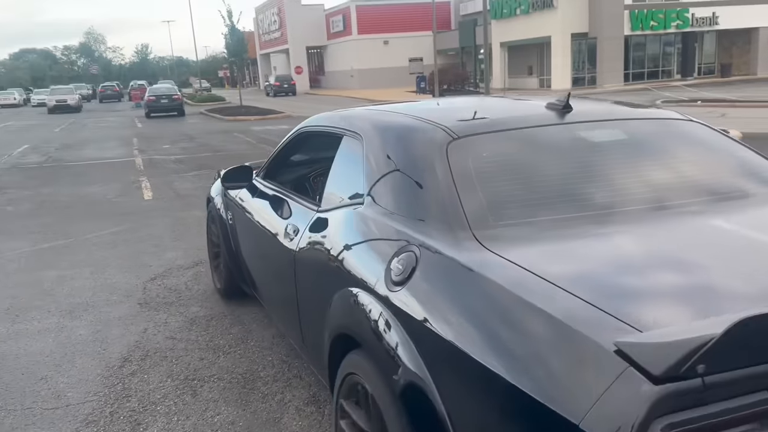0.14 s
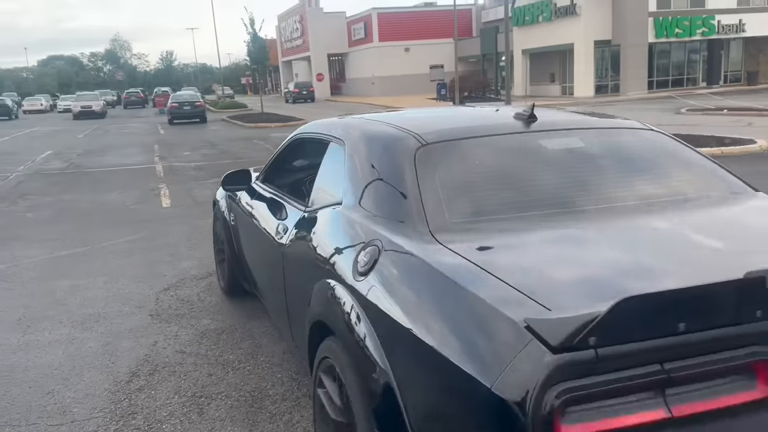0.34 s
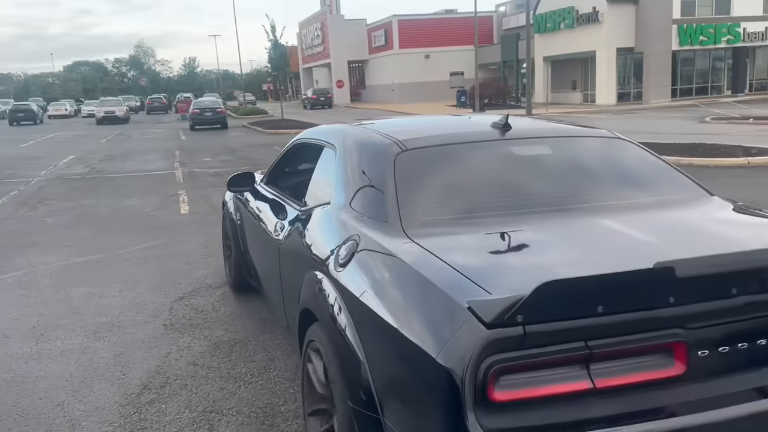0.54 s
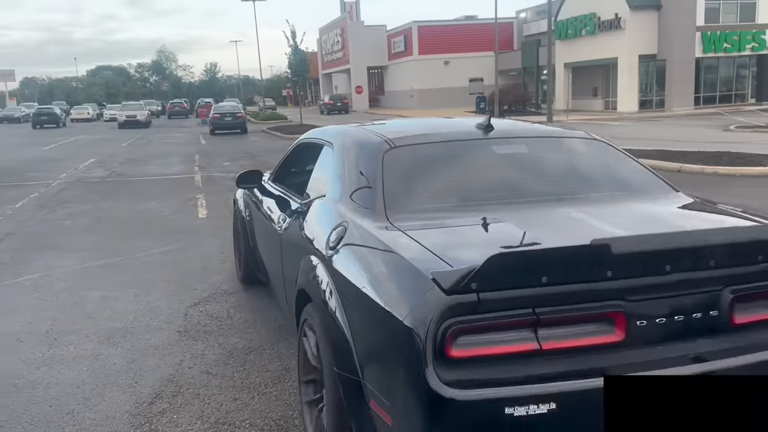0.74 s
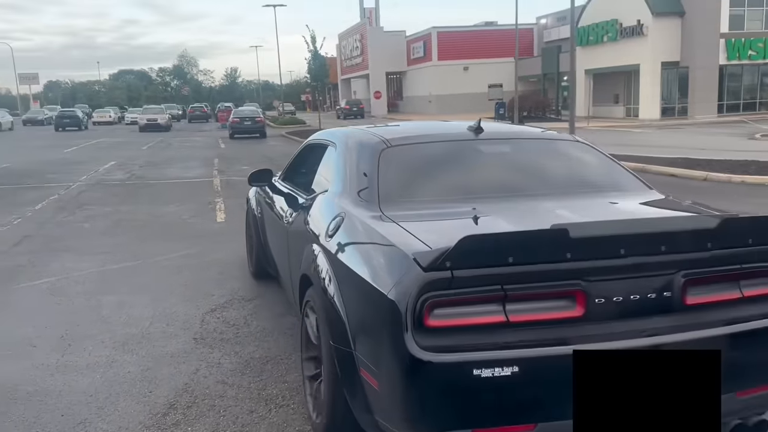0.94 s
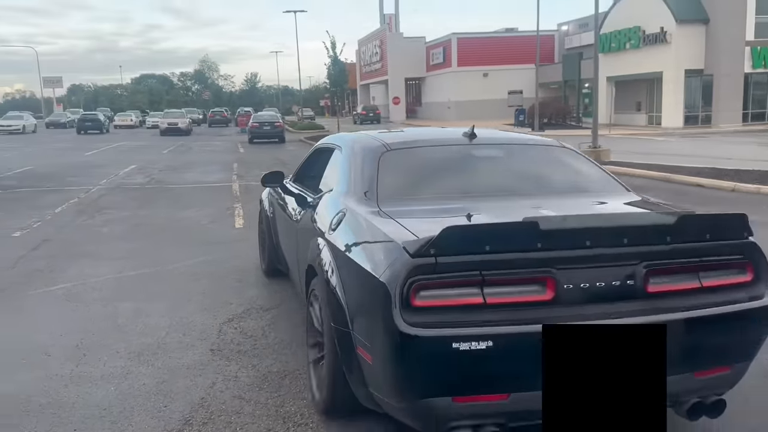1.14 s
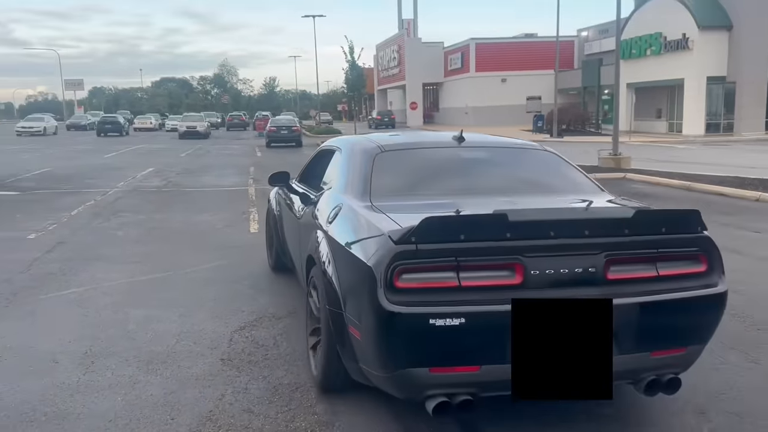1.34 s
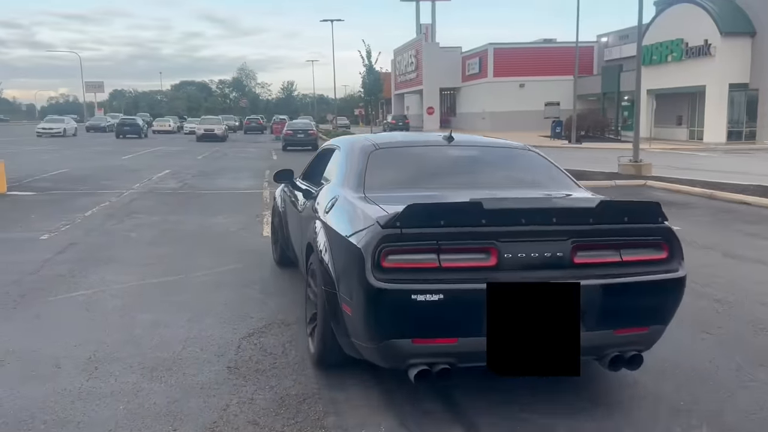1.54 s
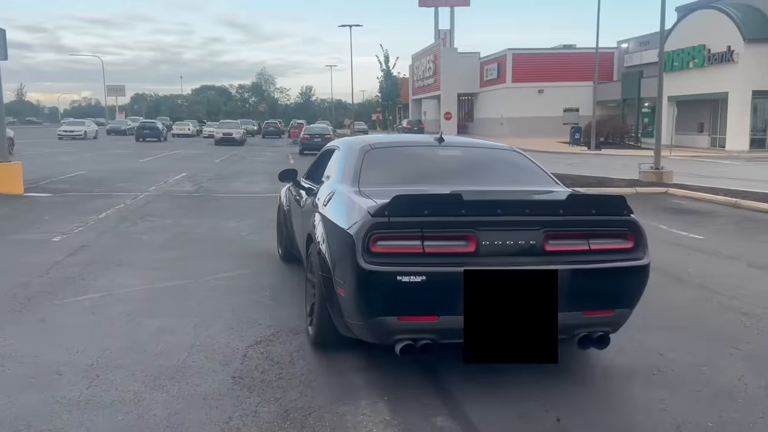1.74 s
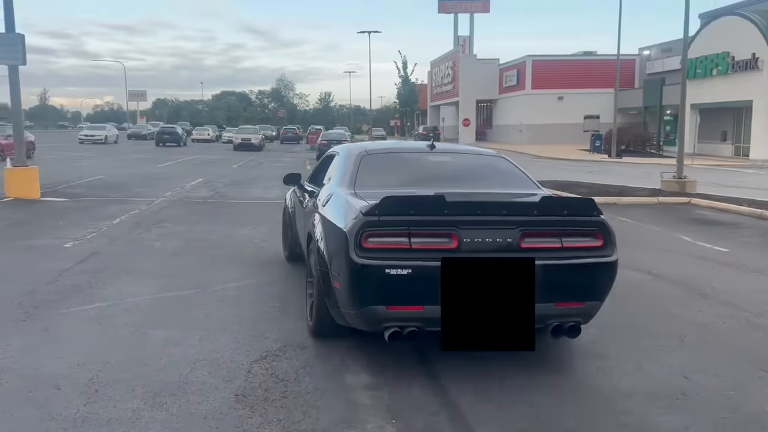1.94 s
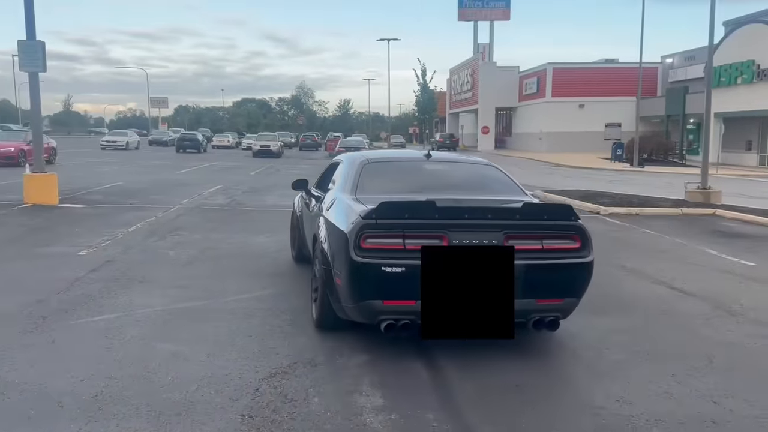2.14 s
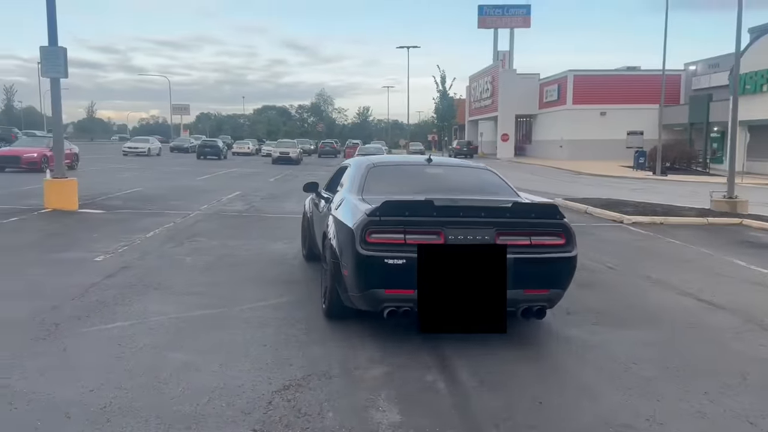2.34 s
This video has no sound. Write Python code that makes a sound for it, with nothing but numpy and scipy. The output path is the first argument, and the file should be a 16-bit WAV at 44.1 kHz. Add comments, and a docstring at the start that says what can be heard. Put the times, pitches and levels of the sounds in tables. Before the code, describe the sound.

A powerful V8 car pulls away from low revs in an open car park, its bassy, uneven exhaust burble rising in pitch, with raspy puffs, faint tyre hiss and gritty scuffs, heard close from behind.

```python
"""In an open car park an eight-cylinder engine pulls away from low revs, its firing rate climbing.
The exhaust is a firing note with its octave, uneven pulses ringing the pipes, and puffs of noise.
Coloured noise makes the rumble, hiss, gritty scuffs and two ticks on the asphalt.
A low hum fades early, a soft low swell comes near the end, and a thin echo follows the engine."""
import sys
import numpy as np
from scipy import signal
from scipy.fft import rfft, irfft, next_fast_len
from scipy.io import wavfile
from scipy.ndimage import uniform_filter1d, minimum_filter1d, map_coordinates

SR = 44100
rng = np.random.default_rng(int(sys.argv[2]) if len(sys.argv) > 2 else 0)


def to_wav(s):
    """Save 16-bit WAV."""
    ch = np.atleast_2d(s).T  # columns
    pcm = np.round(np.clip(ch, -1, 1) * 32767)  # PCM
    wavfile.write(sys.argv[1], SR, pcm.astype(np.int16))


N = 110250  # 2.5 s of samples
T = np.arange(N) / SR


def amp(db):
    """Turn decibels into gain."""
    return 10 ** (np.asarray(db) / 20)


def unit(x):
    """Scale a sound to an rms (average strength) of 1."""
    return x / np.sqrt(np.mean(x ** 2) + 1e-20)


def curves(rows):
    """Join the rows with straight lines: one curve for each column after the time."""
    seconds, *columns = np.transpose(rows)
    return [np.interp(T, seconds, column) for column in columns]


def wobble(rate):
    """Draw a smooth random curve through this many random points a second."""
    return map_coordinates(rng.standard_normal(400), [T * rate + 2], mode="wrap")


def filtered(x, response):
    """Multiply the spectrum of x by a response that depends on frequency."""
    size = next_fast_len(N + SR // 4)
    spectrum = rfft(x, size) * response(np.fft.rfftfreq(size, 1 / SR))
    return irfft(spectrum, size)[..., :N]


def coloured(x, points):
    """Shape x by (pitch_hz, level_db) points on a log pitch axis, then scale to rms 1."""
    pitch_hz, level_db = np.transpose(points)
    return unit(filtered(x, lambda hz: amp(np.interp(np.log(hz + 1), np.log(pitch_hz), level_db))))


def spread(mid, side_db):
    """Make stereo: the middle sound, plus separate noise with opposite signs left and right."""
    side = amp(side_db) * rng.standard_normal(N)
    return np.array([mid + side, mid - side])


def noise(points, side_db):
    """Make coloured stereo noise of rms 1."""
    return coloured(spread(rng.standard_normal(N), side_db), points)


# tone colour of the rumble: pitch_hz, level_db (relative)
RUMBLE_COLOUR = [(12, -10.5), (30, -13.5), (55, -5), (150, -3.5), (300, -11.5), (500, -19), (1200, -22),
                 (4000, -71)]


def rumble():
    """Steady noise, strongest in the bass."""
    return amp(-27) * noise(RUMBLE_COLOUR, side_db=-7)


# hiss of tyres and air: start_s, level_db (before its random waver)
HISS = [(0, -49.5), (.7, -49.5), (1.4, -51), (2, -52.5), (2.5, -53)]
# tone colour of the hiss: pitch_hz, level_db (relative)
HISS_COLOUR = [(200, -10.5), (2500, 9.5), (4000, 1.5), (5200, -0.5), (6500, -1.5), (8300, -5.5),
               (9800, -5.5), (11000, -31.5), (13500, -16), (16000, -25.5)]


def hiss():
    """Tyres and air: faint noise with a quick waver, a little stronger on the left."""
    level = amp(curves(HISS)[0] + 1.5 * wobble(60))
    return level * noise(HISS_COLOUR, side_db=-3) * amp([[1.5], [-1.5]])


# gritty scuffs: middle_s, half_length_s, level_db (before a random waver)
SCUFFS = [(0.146, .016, -45), (0.194, 0.025, -49.5), (0.312, 0.0076, -46.5), (0.434, 0.008, -53.5),
          (0.626, 0.035, -57), (0.945, .014, -50), (1.149, 0.0099, -53.5), (1.36, 0.0091, -57.5),
          (1.569, .04, -55), (1.784, 0.0058, -61)]
# tone colour of the scuffs: pitch_hz, level_db (relative)
SCUFF_COLOUR = [(1500, -17.5), (3500, -10.5), (5000, -4), (6700, 4.5), (8300, 1.5), (10500, -19),
                (14000, -26.5), (16000, -23)]


def scuffs():
    """Scuffs on the asphalt: bright noise under bell-shaped swells, roughened by a fast waver."""
    swells = sum(amp(db) * np.exp(-((T - s) / half) ** 2 / 2) for s, half, db in SCUFFS)
    return swells * amp(0.82 * wobble(150)) * noise(SCUFF_COLOUR, side_db=-1)


# ticks: start_s, level_db
TICKS = [(1.167, -36), (2.31, -44.5)]
# tone colour of the ticks: pitch_hz, level_db (relative)
TICK_COLOUR = [(2000, -3), (6000, -6), (8500, -1), (11000, -13.5), (16000, -9.5)]
TICK_DECAY_S = 0.0021


def ticks():
    """Ticks from the asphalt: noise that starts at once and dies away within milliseconds."""
    strikes = sum(amp(db) * (T >= s) * np.exp(-abs(T - s) / TICK_DECAY_S) for s, db in TICKS)
    return strikes * noise(TICK_COLOUR, side_db=0.5)


# low hum beside the firing note: start_s, pitch_hz, level_db (both before a random waver)
HUM = [(0, 69.7, -26), (.3, 66.9, -17), (.5, 71.2, -21.5), (.7, 74.5, -24), (1, 69, -57.5)]


def hum():
    """A low tone of wandering pitch that fades almost to nothing by one second."""
    pitch_hz, level_db = curves(HUM)
    level = np.sqrt(2) * amp(level_db + wobble(2.8))
    return level * np.sin(2 * np.pi * np.cumsum(pitch_hz + 1.4 * wobble(20)) / SR)


THUMP_S, THUMP_HZ, THUMP_WIDTH_S, THUMP_DB = 2.32, 56, 0.037, -16.5  # time is the middle


def thump():
    """A soft low swell: a short bass tone under a bell-shaped level."""
    swell = amp(THUMP_DB) * np.exp(-((T - THUMP_S) / THUMP_WIDTH_S) ** 2)
    return swell * np.sin(2 * np.pi * THUMP_HZ * (T - THUMP_S))


LOT_T60_S = 0.15  # time for the echo to fall by 60 dB
LOT_START_DB, LOT_END_DB = -17.5, -20.5


def car_park(x):
    """A thin echo from the shop fronts: a decaying noise tail with less bass, slowly getting fainter."""
    t = np.arange(SR // 2) / SR
    tail = rng.standard_normal((2, len(t))) * amp(-60 * t / LOT_T60_S) * (t > .01)
    wet = signal.fftconvolve(x, tail / np.linalg.norm(tail[0]), axes=1)[:, :N]
    wet = filtered(wet, lambda f: f / (f + 150))
    return wet * amp(np.linspace(LOT_START_DB, LOT_END_DB, N))


# the eight cylinders in firing order, the first with a weak pulse; the functions below share them:
# puff_level_db, pulse_level_db (relative), delay_firings, ring_pitch_ratio (before sway)
CYLINDERS = [(-4, -9, 0.035, .92), (-3, 4.8, -0.044, 1.08), (-1.5, 3.87, 0.018, 1.047),
             (-8, 3.2, 0.028, 1.04), (-2, 1.2, -0.031, 0.995), (-4.5, 0.6, -0.009, 0.987),
             (-3, 0.8, -0.048, 0.938), (0, 0.1, 0.06, 0.82)]
# firings with a stronger puff: time_s, extra_level_db
HARD_FIRINGS = [(.43, 2), (.535, 3), (.903, 1), (1.039, 3), (1.413, 4), (1.535, 5.5), (1.653, 8)]
PUFF_RISE, PUFF_FALL, PUFF_LEAD, PUFF_JITTER = 0.16, 0.22, 0.0803, .03  # in firings
PUFF_SCATTER_DB = 4.5


def puff_train(turn, between, repeat, side_db):
    """A burst of turbulent gas at each firing; a share of its noise repeats every engine cycle."""
    n, count = len(CYLINDERS), 200
    chance = rng.standard_normal((count, 2))
    firing = (turn + PUFF_LEAD).astype(int)
    size_db = np.array(CYLINDERS)[np.arange(count) % n, 0] + PUFF_SCATTER_DB * chance[:, 0]
    for s, extra_db in HARD_FIRINGS:
        size_db[firing[int(s * SR)]] += extra_db
    late = abs(PUFF_JITTER * chance[firing, 1])
    age = np.maximum((turn + PUFF_LEAD) % 1 - late, 0)
    shape = (1 - np.exp(-(age / PUFF_RISE) ** 2)) * np.exp(-age / PUFF_FALL)
    # each cylinder replays its own noise from the moment it fires
    since = np.arange(N) - np.searchsorted(firing, firing)
    own = rng.standard_normal((n, SR // 10))[firing % n, since]
    share = np.clip(repeat, 0, 1)
    gas = np.sqrt(share) * own + np.sqrt(1 - share) * rng.standard_normal(N)
    # "between" is the steady flow under the puffs
    return (between + amp(size_db[firing]) * shape / shape.max()) * spread(gas, side_db)


def broad(gas, level, colour):
    """Puffs of gas heard in one broad register."""
    return amp(curves(level)[0]) * coloured(gas, colour)


PUFF_CEILING = 3.0  # the ring saturates around this multiple of its rms


def rung(gas, turn, track, width_hz, sway):
    """Puffs ring a resonance whose pitch shifts from cylinder to cylinder through each cycle."""
    pitch_hz, level_db = curves(track)
    ratio = np.array(CYLINDERS)[(turn + PUFF_LEAD).astype(int) % len(CYLINDERS), 3]
    carrier = np.exp(2j * np.pi * np.cumsum(pitch_hz * ratio ** sway) / SR)
    # shift the resonance down to zero pitch, keep a narrow band, then shift it back
    low_pass = signal.butter(2, width_hz / 2, fs=SR, output="sos")
    band = signal.sosfilt(low_pass, gas / carrier)
    band = band / np.sqrt(1 + (unit(abs(band)) / PUFF_CEILING) ** 2)
    return amp(level_db) * unit((band * carrier).real)


# gas puffs in three broad registers, low to high, each: start_s, level_db
CHUFF = [(0, -34.5), (0.501, -32), (1.001, -35.5), (1.501, -43), (1.901, -34.5), (2.201, -31.5), (2.5, -32)]
RASP = [(0, -40), (.5, -39), (1, -32.5), (1.501, -36.5), (1.801, -35.5), (2.101, -42.5), (2.5, -48.5)]
CRACKLE = [(0, -53), (.5, -48.5), (1.099, -49.5), (1.5, -44.5), (1.899, -47), (2.2, -40), (2.5, -43.5)]
# their tone colours, each: pitch_hz, level_db (relative)
CHUFF_COLOUR = [(250, -19), (410, -7), (550, -0.5), (720, -2), (850, -7.5), (1000, -16), (2000, -66.5)]
RASP_COLOUR = [(700, -50), (1000, 3), (1150, -2.5), (1420, 7.5), (1650, -11), (2300, -60)]
CRACKLE_COLOUR = [(1200, -35.5), (1680, 1), (1900, 4), (2200, 1.5), (2550, -1.5), (2900, -10.5),
                  (3400, -14), (4200, -25), (7000, -55.5)]
# two resonances rung by the puffs, higher at the end as the gas gets hotter and faster, each:
# start_s, pitch_hz (before each cylinder's ratio), level_db
BARK = [(0, 957, -27), (0.449, 931, -26), (0.798, 946, -28), (1.2, 986, -32.5), (1.6, 1152, -33),
        (1.849, 1177, -35), (2.1, 1064, -43.5), (2.5, 1080, -60)]
SNARL = [(0, 1880, -47.5), (0.501, 2003, -44), (0.952, 2286, -43), (1.298, 2580, -41), (1.598, 2680, -46),
         (1.902, 2780, -44), (2.098, 3130, -61), (2.5, 3236, -69)]


def exhaust_gas(turn):
    """Gas puffs fill three broad registers and ring a bark and, above it, a snarl."""
    chuff_gas = puff_train(turn, between=0.32, repeat=0.54, side_db=-8.5)
    chuff = broad(chuff_gas, CHUFF, CHUFF_COLOUR)
    rasp_gas = puff_train(turn, between=0.21, repeat=0.75, side_db=-3)
    rasp = broad(rasp_gas, RASP, RASP_COLOUR)
    crackle_gas = puff_train(turn, between=.2, repeat=.3, side_db=-9)
    crackle = broad(crackle_gas, CRACKLE, CRACKLE_COLOUR)
    bark_gas = puff_train(turn, between=0.076, repeat=0.26, side_db=-11.5)
    bark = rung(bark_gas, turn, BARK, width_hz=183, sway=0.93)
    snarl_gas = puff_train(turn, between=0.019, repeat=0.1, side_db=-6)
    snarl = rung(snarl_gas, turn, SNARL, width_hz=387, sway=0.39)
    return (bark + rasp) * amp([[-.3], [.3]]) + (chuff + crackle + snarl) * amp([[-1.2], [1.2]])


# exhaust pipe resonances: pitch_hz, width_hz, level_db (relative)
PIPES = [(67.4, 9.9, -7.5), (117, 52.5, -5), (163.5, 18.4, 2), (260.9, 26.5, -3.5), (300.3, 41, -13.5),
         (343.6, 13.8, -11.5), (520, 40, -33)]
# uneven beat of the pipes: start_s, below_210_hz_level_db, 210_to_325_hz_level_db, above_325_hz_level_db
LOPE = [(0, -20, -38, -33), (.4, -20.5, -33.5, -32), (.65, -23, -28.5, -30.5), (1, -23.5, -27.5, -31),
        (1.3, -25.5, -23, -37), (1.6, -19.5, -22.5, -36), (1.9, -17, -17, -36), (2.2, -14, -21.5, -32.5),
        (2.5, -12.5, -21, -29.5)]
PULSE_LAG_TURN, LOPE_WAVER_DB = -0.14, 2.26  # lag in firings


def pipe_response(f):
    """Add up the pipe resonances, with the sign flipped from one to the next."""
    total = 0
    for k, (centre, width, db) in enumerate(PIPES):
        peak = 1j * f * width / (centre * centre - f * f + 1j * f * width)
        total = total + (-1) ** k * amp(db) * peak
    return total


def lope(turn):
    """Unequal, unevenly spaced pulses make tones at multiples of the engine cycle, which ring the pipes."""
    _, pulse_db, delay, _ = np.transpose(CYLINDERS)
    n = len(CYLINDERS)
    pulses = np.zeros(N)
    for k in range(4, 66):
        if k in (n, 2 * n):  # the boom plays the firing note and its octave
            continue
        turns = np.arange(n) + delay + PULSE_LAG_TURN
        line = np.sum(amp(pulse_db) * np.exp(-2j * np.pi * k * turns / n))
        size = abs(line) * (amp(-2.0) if k % n == 0 else 1)
        tone = np.cos(2 * np.pi * k * turn / n + np.angle(line))
        pulses += size * amp(LOPE_WAVER_DB * wobble(6)) * tone
    ring = filtered(pulses, pipe_response)
    low = filtered(ring, lambda f: 1 / (1 + (f / 210) ** 12))
    high = filtered(ring, lambda f: 1 - 1 / (1 + (f / 325) ** 24))
    middle = ring - low - high
    low_db, middle_db, high_db = curves(LOPE)
    return amp(low_db) * unit(low) + amp(middle_db) * unit(middle) + amp(high_db) * unit(high)


# the exhaust's boom: start_s, firing_note_level_db, octave_level_db (before waver; octave before sag)
BOOM = [(0, -16.5, -15), (.3, -18.5, -16), (.6, -14, -13), (.9, -13, -12), (1.1, -14, -11), (1.3, -11, -10),
        (1.6, -11.5, -12), (1.8, -14, -12.5), (2, -17, -13), (2.2, -16.5, -12), (2.35, -18.5, -15.5),
        (2.5, -21.5, -20)]
# dip of the octave near the weak cylinder: start_s, depth_db (a negative depth is a swell)
SAG = [(0, -2.5), (1.2, -1.5), (1.7, -2), (2.1, 3.5), (2.5, 5.5)]
SAG_AT_TURN, SAG_WIDTH_TURN, BOOM_LAG_TURN = 0.34, .8, 0.29  # in firings
LOW_MODE_HZ, LOW_MODE_WIDTH_HZ, BOOM_WAVER_DB = 58.8, 9.2, 0.74


def boom(rate, turn):
    """The firing note and its octave; the note falls behind as it climbs through the lowest pipe mode."""
    note_db, octave_db = curves(BOOM)
    n = len(CYLINDERS)
    from_weak = (turn - SAG_AT_TURN + n / 2) % n - n / 2
    sag = np.exp(-(from_weak / SAG_WIDTH_TURN) ** 2 / 2)
    octave_db = octave_db - curves(SAG)[0] * (sag - sag.mean())
    angle = 2 * np.pi * (turn - BOOM_LAG_TURN)
    behind = np.pi / 2 + np.arctan((rate - LOW_MODE_HZ) / LOW_MODE_WIDTH_HZ)
    note = amp(note_db + BOOM_WAVER_DB * wobble(18)) * np.cos(angle - behind)
    octave = amp(octave_db + BOOM_WAVER_DB * wobble(17)) * np.cos(2 * angle)
    return np.sqrt(2) * (note + octave)


# engine speed: start_s, firing_rate_hz
SPEED = [(0, 51.86), (0.2, 52.51), (0.38, 54.0), (0.6, 56.9), (0.85, 58.37), (1.05, 58.65), (1.3, 62.36),
         (1.55, 66.67), (1.8, 70.7), (2.05, 77.17), (2.3, 82.98), (2.5, 86.37)]
START_TURN = .66  # in firings


def scene():
    """The crank's angle, counted in firings, drives the boom, the lope and the gas puffs."""
    rate, = curves(SPEED)
    turn = START_TURN + np.cumsum(rate) / SR
    car = boom(rate, turn) * amp([[-.25], [.25]])
    car = car + lope(turn) * amp([[-.55], [.55]]) + exhaust_gas(turn)
    background = rumble() + hum() + thump() + hiss() + scuffs() + ticks()
    return car + car_park(car) + background


LIMIT, LIMIT_HOLD_S, TOP_HZ = .93, .02, 15800  # limit: peak height that starts the easing


def record(dry):
    """The recorder eases its gain down on the tallest peaks and keeps nothing above its band limit."""
    hold = int(LIMIT_HOLD_S * SR)
    needed = LIMIT / np.maximum(abs(dry).max(axis=0), LIMIT)
    gain = uniform_filter1d(minimum_filter1d(needed, hold), hold)
    return filtered(dry * gain, lambda hz: hz < TOP_HZ)


dry = scene()
out = record(dry)
to_wav(out)
```